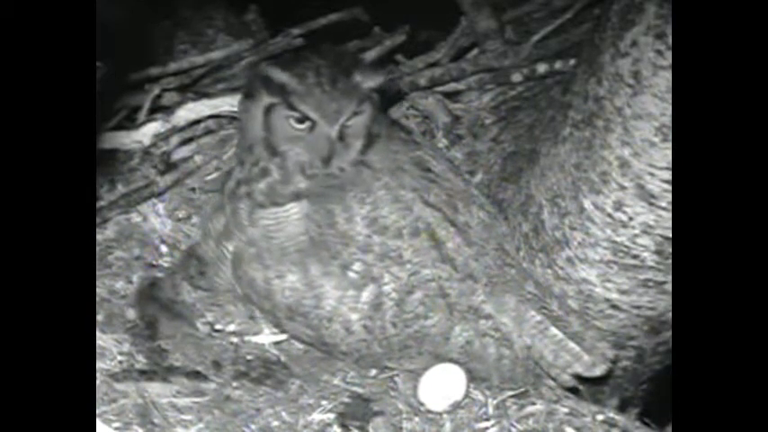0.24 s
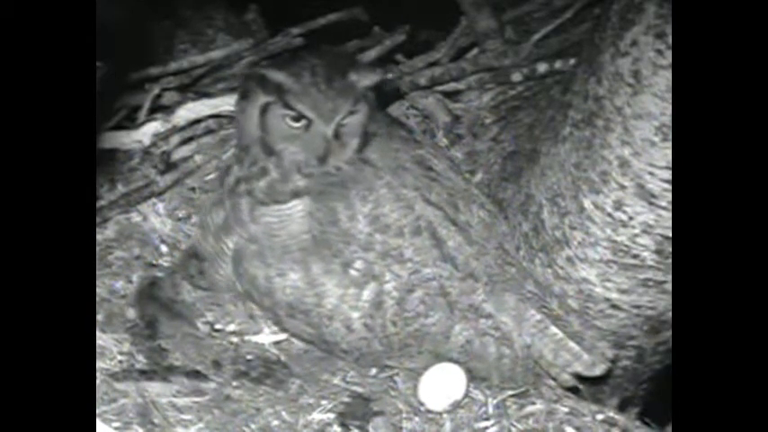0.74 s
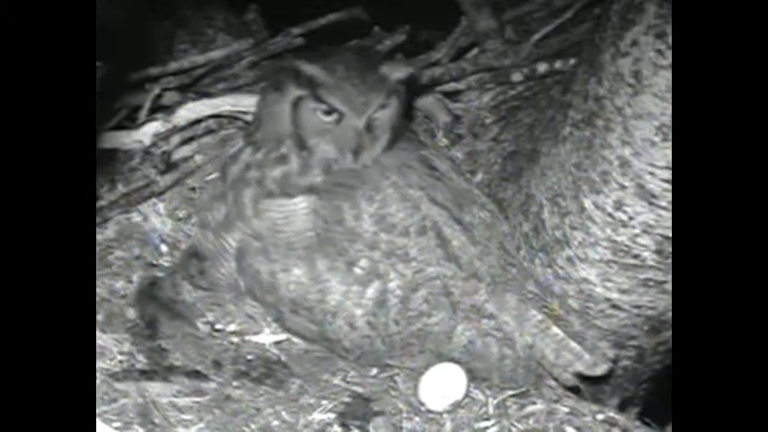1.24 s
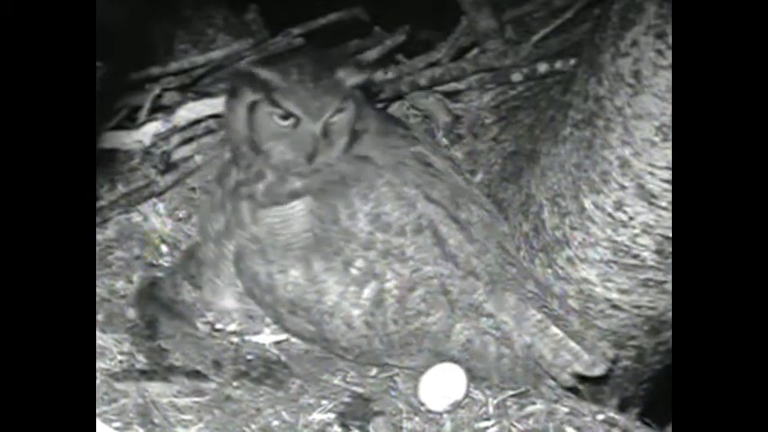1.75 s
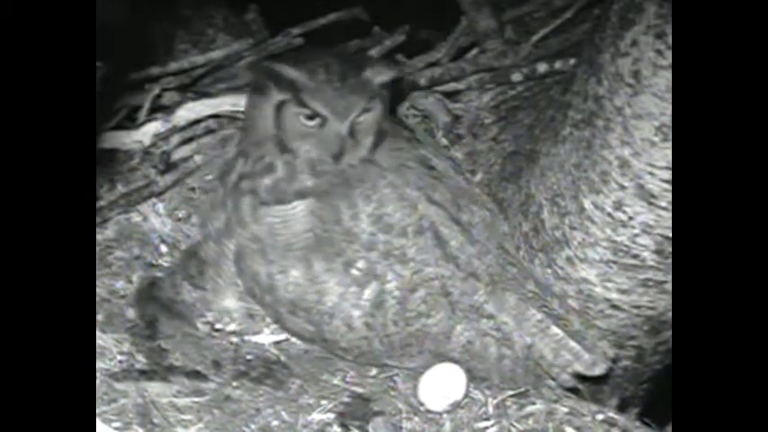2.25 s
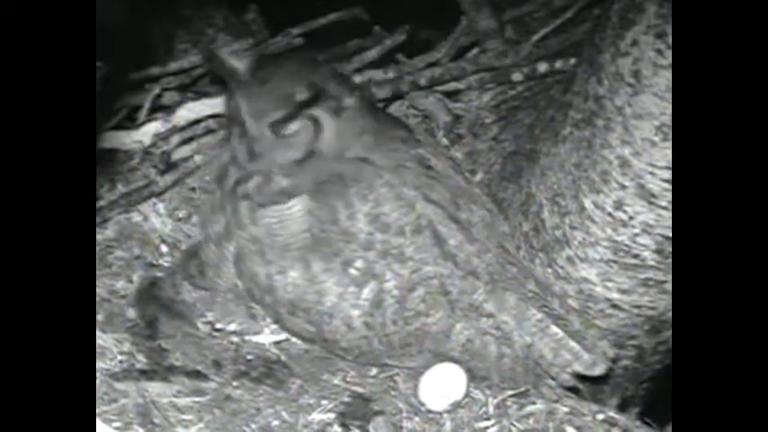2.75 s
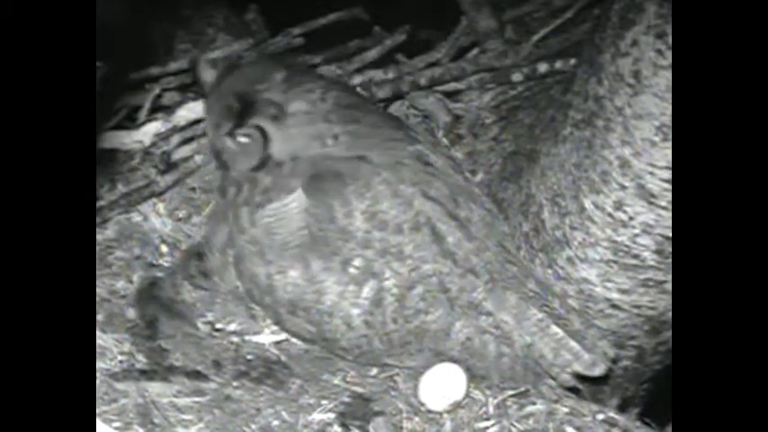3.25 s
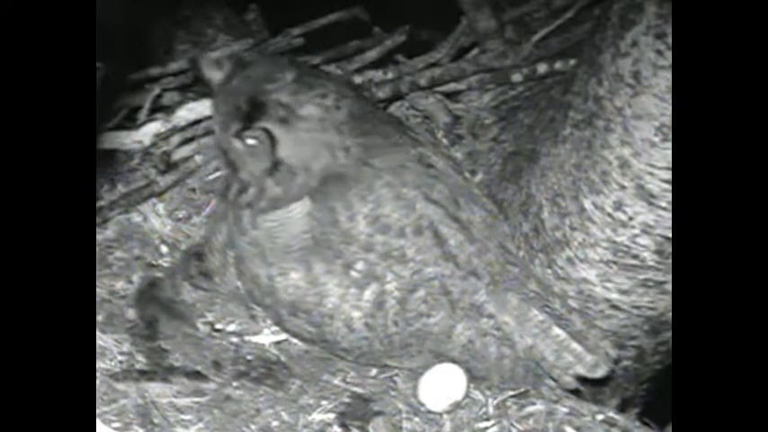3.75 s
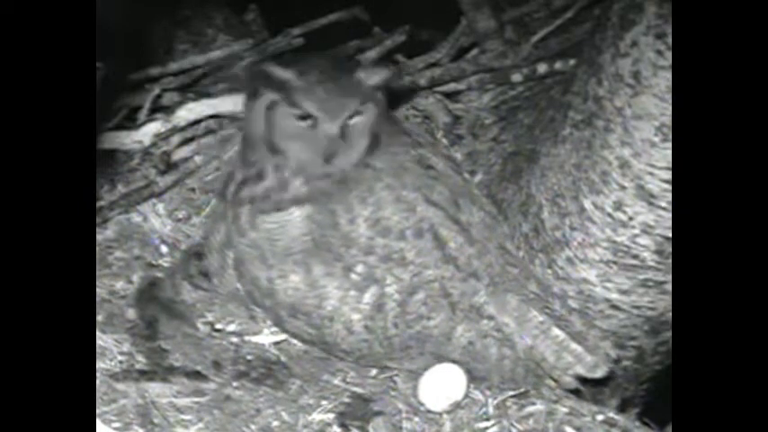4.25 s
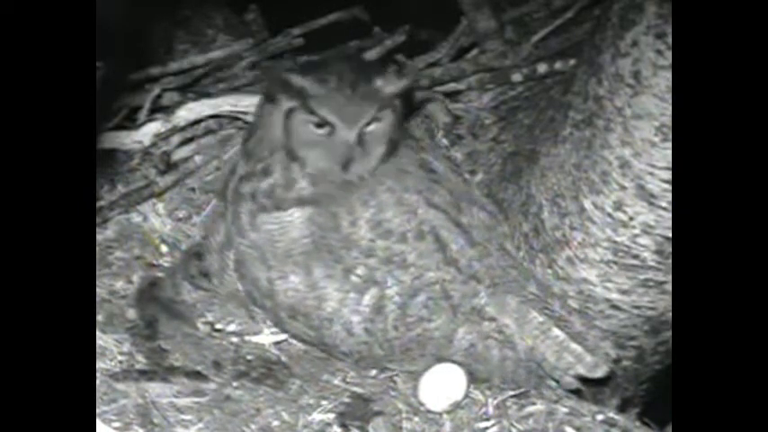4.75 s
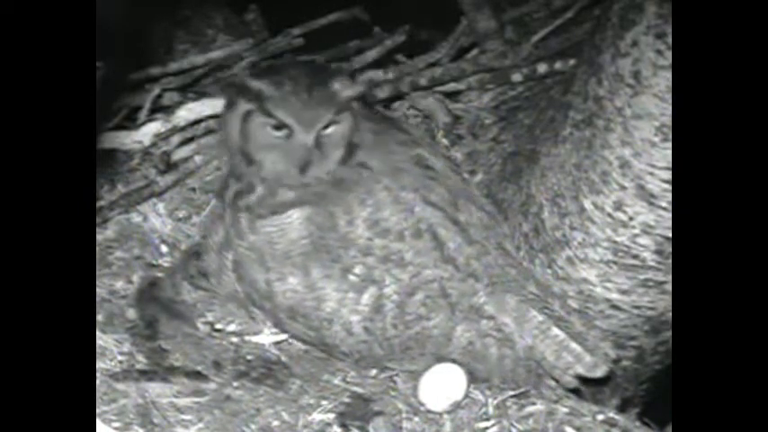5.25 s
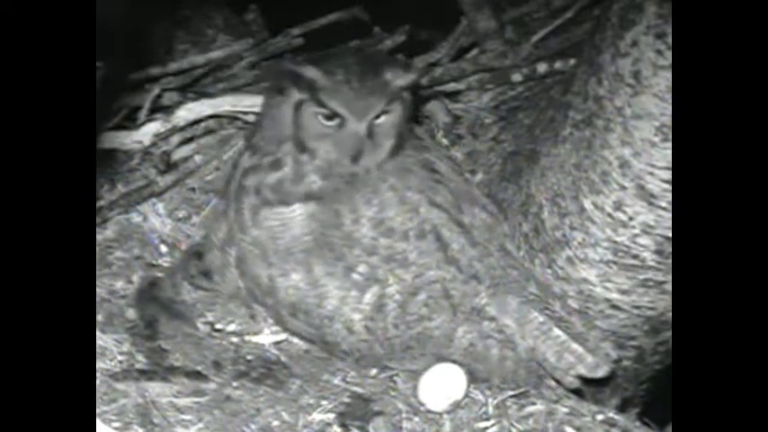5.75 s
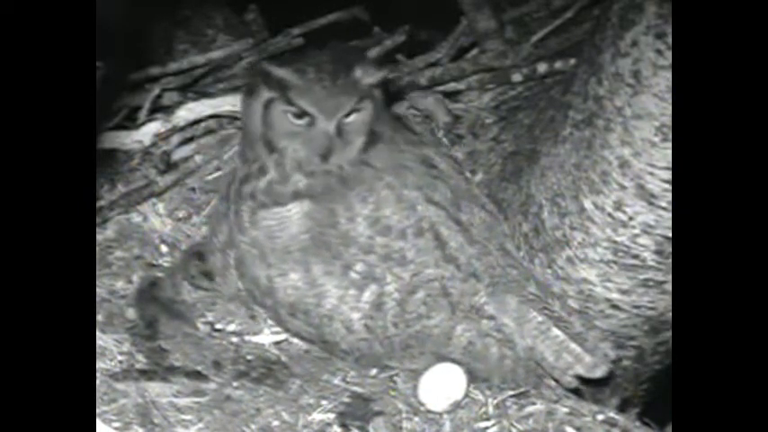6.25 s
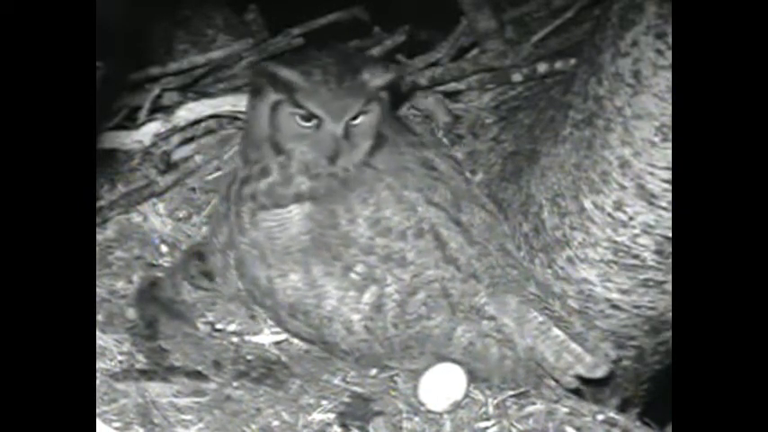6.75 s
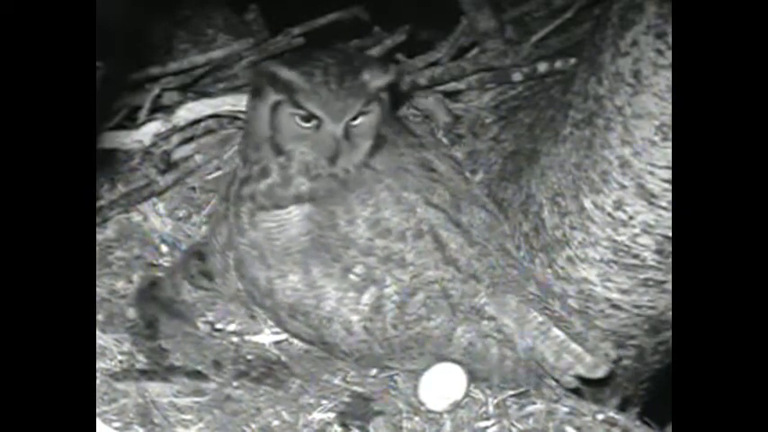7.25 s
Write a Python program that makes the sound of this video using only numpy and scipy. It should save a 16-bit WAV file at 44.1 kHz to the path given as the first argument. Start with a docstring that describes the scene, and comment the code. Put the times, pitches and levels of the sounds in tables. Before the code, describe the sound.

A night nest heard through a small, noisy microphone close to a large owl. Steady midrange hiss, a faint buzzing electrical whine and a soft hollow drone of breeze last the full 7.5 seconds. From the start, dull short drip knocks, low wind pops and tiny bright ticks fall irregularly, with small crackly flurries near 0 and 1 second. At about 1.25 seconds the owl begins one low hoot, a nearly pure, trembling tone with a little throat air; it starts weakly, swells, edges upward in pitch and ends by 1.55, just as a knock lands. No more calls follow. Firmer hollow knocks come around 2.8, 3.2, 5.6 and 6.0 seconds, with a sharper tick at 5.4. Between 6.0 and 6.6 the ticks cluster with faint twig rustling, then thin out to sparse ticks, a last knock near 7.3 and unchanged hiss.

```python
"""An owl at a nest gives one short low hoot: a trembling near sine, weak upper partials, throat air.
Drips ring the modes of the microphone's hollow housing; wind pops, drones and rumbles in it.
Small ticks and a patter ring near 2.3 kHz; twigs rustle as shaped noise.
The electronics add coloured hiss and a faint whine that sweeps in step with the mains."""
import sys
import numpy as np
from scipy import signal
from scipy.fft import rfft, irfft
from scipy.io import wavfile
from scipy.ndimage import uniform_filter1d

SR = 44100
rng = np.random.default_rng(int(sys.argv[2]) if len(sys.argv) > 2 else 0)


def persist_wave(psi):
    """Save psi, clipped to +-1, as 16-bit WAV."""
    counts = np.round(np.clip(psi, -1, 1) * 32767).astype(np.int16)
    wavfile.write(sys.argv[1], SR, np.atleast_2d(counts).T)


N = 330573

# Hoot contour: (time [s], strongest partial before tremble [Hz], level of the strongest partial [dB])
HOOT_CONTOUR = [(1.25, 379.5, -49), (1.262, 432, -46), (1.272, 441, -43), (1.29, 426, -58),
                (1.299, 438, -40), (1.32, 408, -44.5), (1.329, 413, -34), (1.348, 391, -36),
                (1.368, 384, -33.5), (1.383, 399, -31.5), (1.4, 416.6, -31), (1.434, 406, -30.5),
                (1.45, 432, -29.5), (1.476, 417, -30), (1.5, 428, -32), (1.521, 432, -31), (1.53, 445, -47),
                (1.536, 447, -39), (1.554, 451, -40)]
# Hoot partials: (multiple of the strongest partial [1], relative level [dB], flutter depth [dB])
VOICE_PARTIALS = [(1, 0, .2), (1.5, -15, 1.3), (2, -29, 2.5)]
# Throat air colour: (frequency [Hz], relative level [dB])
THROAT_AIR_COLOUR = [(250, -20), (400, -5), (520, 4), (600, -3), (700, 1), (800, -12), (1300, -40)]
# Housing modes: (frequency [Hz], relative level [dB], decay by 60 dB [s], sign at microphone [1])
HOUSING_MODES = [(314, -9.7, .042, 1), (362, -11.5, .09, -1), (435, 0, .023, -1), (464, -25.6, .125, -1),
                 (536, -12, .078, -1), (694, -30.2, .044, -1), (1010, -23, .025, 1)]
# Drips on the housing: (time [s], peak [dB], lowest mode over its usual strength [dB])
DRIP_KNOCKS = [(0.091, -32.5, 1), (0.229, -41, -6), (0.404, -40.5, -6), (0.5587, -37, -11),
               (0.7285, -36.5, -3), (0.8333, -40.5, 1), (0.942, -40.5, 10), (1.125, -42, -9),
               (1.564, -30.5, 2.5), (1.6787, -34.5, 0), (1.7507, -41, 1), (1.779, -56, 2),
               (2.019, -41, -22), (2.2126, -42, 9.5), (2.3914, -36, -1), (2.5415, -35.5, 0),
               (2.8189, -32, -10), (3.0139, -48, -5), (3.0598, -45, -3), (3.179, -29, 1.5),
               (3.3491, -55, 0), (3.4546, -40.5, -5), (3.6742, -46.5, 2), (4.2633, -40.5, -11),
               (4.7649, -40.5, -8), (5.0119, -43.5, -14), (5.323, -41.5, -7), (5.3581, -41.5, 0),
               (5.5865, -25.5, -0.5), (5.7122, -45, -5), (5.798, -39, -5), (5.984, -28, 0),
               (6.124, -39.5, -1), (6.331, -35.5, 2), (6.3487, -37, 3), (7.3381, -36.5, 2)]
# Low pops of wind on the microphone: (time [s], peak [dB], pitch [Hz])
WIND_POPS = [(0.165, -41, 423), (0.327, -36, 375), (0.343, -39, 230), (0.355, -44, 382), (0.463, -40, 285),
             (0.491, -39.5, 495), (0.75, -39, 460), (1.108, -39.5, 420), (1.204, -38, 540),
             (1.244, -44, 358), (1.682, -50, 228), (1.835, -43, 418), (1.956, -37, 413), (1.975, -36, 433),
             (2.023, -40, 444), (2.223, -40, 425), (2.26, -41, 420), (2.281, -39, 415), (2.324, -44, 414),
             (2.377, -47, 480), (2.441, -46, 450), (2.806, -38, 427), (2.82, -33.5, 387),
             (3.022, -39.5, 450), (3.094, -41, 450), (3.429, -38.5, 520), (3.544, -43, 450),
             (3.79, -38.5, 448), (4.098, -40, 393), (4.298, -43.5, 282), (5.319, -45, 376),
             (5.48, -43, 450), (5.854, -38, 376), (5.865, -37, 317), (6.166, -47, 455), (6.925, -38, 450),
             (7.174, -48, 266), (7.364, -49, 420)]
# Single ticks: (time [s], peak [dB], pitch [Hz])
SINGLE_TICKS = [(0.041, -52, 2290), (0.0533, -42, 2370), (0.0782, -50, 2230), (0.188, -51, 2360),
                (0.3208, -42.5, 2370), (0.3441, -45, 2250), (0.4035, -52, 2280), (0.426, -52, 2260),
                (0.521, -56, 2230), (0.5018, -53, 2200), (0.5976, -38.5, 2320), (0.6529, -50, 2280),
                (0.8555, -44.5, 2150), (0.938, -51, 2330), (0.9652, -47, 2220), (0.976, -49, 2220),
                (0.985, -49, 2250), (0.996, -48, 2310), (1.0071, -45, 2290), (1.0944, -54, 2350),
                (1.102, -50, 2380), (1.2161, -55, 2230), (1.365, -54, 2300), (1.3995, -43, 2320),
                (1.466, -52, 2220), (1.483, -51, 2250), (1.52, -53, 2290), (1.617, -53, 2360),
                (1.63, -53, 2300), (1.66, -47, 2370), (1.85, -52, 2370), (1.904, -54, 2330),
                (1.924, -49, 2280), (1.9584, -51, 2250), (2.1874, -55, 2330), (2.4818, -49, 2280),
                (2.511, -47, 2280), (2.55, -56, 2330), (2.566, -52, 2200), (2.6609, -42, 2440),
                (2.83, -54, 2290), (2.853, -52, 2190), (2.9445, -46.5, 2290), (3.0255, -47.5, 2340),
                (3.047, -57, 2280), (3.0845, -51, 2380), (3.572, -48, 2280), (3.7504, -50, 2460),
                (3.8043, -49, 2320), (3.813, -50, 2290), (3.845, -53, 2370), (3.9127, -42, 2340),
                (4.2413, -45.5, 2300), (4.252, -54, 2290), (4.4079, -45.5, 2270), (4.5461, -47.5, 2280),
                (4.686, -45.5, 2380), (4.8357, -43, 2300), (4.9234, -52, 2220), (4.9521, -49, 2320),
                (5.015, -44, 2340), (5.049, -45, 2290), (5.1637, -47, 2350), (5.249, -49, 2380),
                (5.3562, -52, 2260), (5.444, -36.5, 2360), (5.672, -52, 2400), (5.9065, -46, 2340),
                (6.0521, -50, 2420), (6.082, -57, 2290), (6.204, -54, 2310), (6.278, -57, 2300),
                (6.296, -49, 2270), (6.313, -53, 2260), (6.3355, -55, 2240), (6.346, -49, 2240),
                (6.377, -49, 2230), (6.398, -47, 2250), (6.411, -45, 2260), (6.4423, -47, 2300),
                (6.533, -56, 2300), (6.7131, -53, 2170), (6.7562, -44.5, 2380), (6.8379, -49, 2330),
                (6.865, -54, 2310), (6.936, -53, 2300), (7.0344, -53, 2190), (7.1556, -54, 2300),
                (7.17, -56, 2410), (7.36, -57, 2330)]
# Flurries of small ticks as the nest stirs: (start [s], end [s], level [dB], pitch [Hz])
TICK_FLURRIES = [(0, 0.106, -59.5, 2290), (0.273, 0.36, -81, 2270), (0.398, 0.448, -73, 2270),
                 (0.486, 0.542, -64, 2160), (0.885, 0.945, -75, 2330), (0.95, 1.0, -59.5, 2210),
                 (1.0, 1.065, -60.5, 2200), (1.068, 1.083, -62, 2280), (1.092, 1.116, -65, 2380),
                 (1.45, 1.559, -62.5, 2290), (1.641, 1.681, -61, 2330), (1.822, 2.003, -72, 2300),
                 (2.08, 2.13, -66, 2340), (2.294, 2.33, -65, 2330), (2.47, 2.525, -65, 2300),
                 (2.538, 2.583, -64, 2270), (2.81, 2.863, -69, 2290), (3.01, 3.114, -66, 2330),
                 (3.12, 3.192, -63.5, 2260), (3.79, 3.824, -71, 2290), (4.106, 4.273, -71, 2250),
                 (4.883, 5.067, -72, 2290), (6.042, 6.09, -68, 2360), (6.15, 6.16, -63, 2210),
                 (6.198, 6.25, -67, 2290), (6.25, 6.376, -64, 2250), (6.362, 6.43, -56, 2236),
                 (6.423, 6.475, -64, 2380), (6.507, 6.55, -73, 2300), (6.588, 6.613, -62.5, 2230),
                 (6.83, 6.88, -66, 2330), (7.345, 7.43, -66, 2290)]
# Steady patter of small ticks: (pitch [Hz], relative level [dB])
PATTER_PITCHES = [(2190, -11), (2240, 2), (2320, -3), (2430, 0)]
# Leaf and twig colour: (frequency [Hz], relative level [dB])
TWIG_COLOUR = [(600, -6.5), (1000, -1), (1600, -2), (2300, -4), (3000, -12), (3800, -21)]
# Breeze: (time [s], level of the drone in the housing [dB])
BREEZE_LEVEL = [(0, -51.5), (0.3, -50.5), (0.6, -52), (0.9, -50), (1.2, -50), (1.6, -49.5), (2.0, -49.5),
                (2.4, -50), (2.8, -49.5), (3.2, -49.5), (3.7, -49.5), (4.0, -51.5), (4.6, -51),
                (5.2, -51.5), (5.7, -52), (6.1, -50), (6.6, -51), (7.0, -52), (7.5, -52.5)]
# Drone colour: (frequency [Hz], relative level [dB])
DRONE_COLOUR = [(150, -29.5), (250, -14), (350, -4), (430, 0), (550, -1.5), (700, -7), (1000, -17.5),
                (1500, -30)]
# Low gusts: (peak time [s], peak level [dB], fade [dB/s])
GUST_TIMES = [(0.05, -64.5, 85), (0.34, -56, 139), (0.47, -57, 160), (0.6, -71, 7.5), (0.98, -74, 27.5),
              (1.67, -60, 52), (2.22, -64, 48.5), (2.46, -57, 53), (3.55, -69.5, 25), (4.09, -61, 150),
              (4.26, -57.5, 67), (4.4, -72, 94), (4.85, -71, 31), (5.12, -68, 90), (5.32, -59, 86),
              (5.68, -62, 40), (5.86, -60, 198), (6.12, -65, 108), (7.18, -64, 172)]
# Gust colour: (frequency [Hz], relative level [dB])
GUST_COLOUR = [(30, -7.5), (60, -2.5), (100, 2.5), (160, 0.5), (220, 3), (300, -7.5), (420, -25.5)]
# Whine sweeps in each mains cycle: (start [cycle], end [cycle], from [Hz], to [Hz], mid-sweep rms [dB])
WHINE_SWEEPS = [(0.021, 0.154, 5050, 10610, -62), (0.324, 0.499, 6495, 2676, -68),
                (0.366, 0.519, 8120, 10180, -71.5), (0.477, 0.646, 6000, 10500, -69),
                (0.83, 0.961, 6130, 3670, -84.5)]
# Amplifier hiss colour: (frequency [Hz], relative level [dB])
HISS_COLOUR = [(20, -17), (60, -22.5), (150, -9), (400, -12.5), (1000, 0.5), (2000, 0.5), (3000, 0),
               (4500, -8), (7000, -8.5), (10000, -18.5)]

WAVER_DEPTH_HZ, WAVER_RATE_HZ, WAVER_TOP_S = 4, 55, 1.452  # pitch tremble; highest at WAVER_TOP_S
OVERTONE_LOSS_DB_PER_DB, FULL_VOICE_DB = 2.5, -30.5  # upper partials lose this per dB under full voice
BRIGHTEST_S, DULLING_DB_PER_S = 1.41, 170  # upper partials fade after the brightest moment
THROAT_AIR_DB = -23.5
TICK_RISE_S, TICK_HOLD_S, TICK_TAIL_S, TICK_TAIL_DB = .0011, .0034, .006, -17
SOFT_TICK_DB, SOFT_TICK_STRETCH_PER_DB = -46, .15  # ticks under this peak hold longer
TICK_EDGE_RATIO, TICK_EDGE_DB = 1.137, -9.5  # weaker ring above each single tick
TICK_CYCLES, FAINT_TICK_HZ, FAINT_TICK_DB = 4.84, 2290, -57  # dB: peak of the smallest stray ticks
PATTER_DB = -76
CHIRR_CYCLES, CHIRR_POWER_SHARE = 16, .65  # share of flurry power on the flurry's own pitch
RUSTLE_OVER_BREEZE_DB, RUSTLE_OVER_FLURRY_DB = -12.5, -4
GUST_RISE_DB_PER_S, CALM_DB = 351, -79
MAINS_HZ = 59.977
HISS_DB, FLOOR_DB = -61.5, -102
LOW_CUT_HZ, ROLL_HZ, EDGE_HZ = 220, 8180, 9975


def hoot():
    """Trembling near sine, unsteady partials that come out at full voice, air rushing in the throat."""
    s, hz, db = np.transpose(HOOT_CONTOUR)
    t = np.arange(N) / SR
    level_db = along(s, db)
    waver_hz = WAVER_DEPTH_HZ * np.cos(2 * np.pi * WAVER_RATE_HZ * (t - WAVER_TOP_S))
    strongest_hz = (along(s, hz) + waver_hz) * lumps(.005, .04)
    turns = np.cumsum(strongest_hz) / SR
    effort_db = OVERTONE_LOSS_DB_PER_DB * (level_db - FULL_VOICE_DB)
    effort_db -= DULLING_DB_PER_S * np.maximum(t - BRIGHTEST_S, 0)
    tone = np.zeros(N)
    for multiple, partial_db, flutter_db in VOICE_PARTIALS:
        partial = gain_of(partial_db) * np.sin(2 * np.pi * multiple * turns) * lumps(.0051, flutter_db)
        if multiple > 1:
            partial *= gain_of(effort_db)
        tone += partial
    air = gain_of(THROAT_AIR_DB) * noise(THROAT_AIR_COLOUR)
    sounding = uniform_filter1d(1. * (t > s[0]) * (t < s[-1]), size=600)  # soft ends
    return (np.sqrt(2) * tone + air) * gain_of(level_db) * sounding


def knocks():
    """Drips strike the housing and ring its modes."""
    out = np.zeros(N)
    for at, db, low_db in DRIP_KNOCKS:
        add(out, at, gain_of(db) * knock(low_db))
    return out


def knock(low_db=0):
    """Decaying housing modes, swelling as the blow spreads through the wall; peak 1."""
    t = np.arange(SR // 5) / SR
    ring = np.zeros(len(t))
    for k, (hz, db, t60_s, sign) in enumerate(HOUSING_MODES):
        mode_db = db + low_db * (k == 0) - 60 * t / t60_s
        ring += sign * gain_of(mode_db) * np.sin(2 * np.pi * hz * t)
    ring *= 1 - np.exp(-t / .01)
    return ring / abs(ring).max()


def pops():
    """Wind pops on the microphone: short low blips."""
    out = np.zeros(N)
    for at, db, hz in WIND_POPS:
        add(out, at, gain_of(db) * blip(hz, cycles=1.57))
    return out


def ticks():
    """Fast-rising rings with a weaker higher edge, over random stray ticks."""
    strays = drops(per_s=5.4, spread_db=1)
    out = gain_of(FAINT_TICK_DB) * ringing(strays, blip(FAINT_TICK_HZ, TICK_CYCLES))
    for at, db, hz in SINGLE_TICKS:
        stretch = 1 + SOFT_TICK_STRETCH_PER_DB * max(SOFT_TICK_DB - db, 0)
        add(out, at, gain_of(db) * tick(hz, stretch))
        add(out, at, gain_of(db + TICK_EDGE_DB) * blip(TICK_EDGE_RATIO * hz, TICK_CYCLES))
    return out


def tick(hz, stretch):
    """Sine that starts fast, holds a few cycles, drops to a faint tail; envelope peak 1."""
    t = np.arange(SR // 40) / SR
    hold = np.exp(-(t / (TICK_HOLD_S * stretch)) ** 3)
    tail = gain_of(TICK_TAIL_DB) * np.exp(-t / TICK_TAIL_S)
    shape = (1 - np.exp(-t / TICK_RISE_S)) ** 2 * (hold + tail)
    return shape / shape.max() * np.sin(2 * np.pi * hz * t)


def patter():
    """Dense small ticks on several pitches, louder in flurries."""
    small = np.zeros(N)
    for hz, db in PATTER_PITCHES:
        small += gain_of(db) * ringing(drops(per_s=260, spread_db=1), blip(hz, cycles=10.7))
    level = gain_of(PATTER_DB) + np.sqrt(1 - CHIRR_POWER_SHARE) * stirring()
    return level * evened(small)


def chirr():
    """Flurry ticks on one pitch, dense enough to blend."""
    taps = drops(per_s=400, spread_db=3)
    out = np.zeros(N)
    for start, end, db, hz in TICK_FLURRIES:
        some = taps[round(start * SR):round(end * SR)]
        ring = evened(signal.oaconvolve(some, blip(hz, CHIRR_CYCLES), "same"))
        add(out, start, gain_of(db) * ring * signal.windows.tukey(len(some), .25))
    return np.sqrt(CHIRR_POWER_SHARE) * out


def stirring():
    """Flurry level: each swells, holds and fades."""
    level = np.zeros(N)
    for start, end, db, _ in TICK_FLURRIES:
        add(level, start, gain_of(db) * signal.windows.tukey(round((end - start) * SR), .4))
    return level


def rustle():
    """Leaves and twigs: noise, faint in the breeze, louder as the nest stirs."""
    level = gain_of(RUSTLE_OVER_BREEZE_DB) * breeze() + gain_of(RUSTLE_OVER_FLURRY_DB) * stirring()
    return level * noise(TWIG_COLOUR) * lumps(.0074, 1.4)


def drone():
    """Moving air keeps the hollow droning, with many faint drips; both follow the breeze level."""
    faint_drips = evened(ringing(drops(per_s=60, spread_db=2), knock()))
    return breeze() * (noise(DRONE_COLOUR) * lumps(.029, 1) + gain_of(-16) * faint_drips)


def breeze():
    """Gain of the breeze at every sample."""
    return gain_of(along(*np.transpose(BREEZE_LEVEL)))


def gusts():
    """Low lumpy noise and random puffs rumble with each gust."""
    puffs = evened(ringing(drops(per_s=23, spread_db=3), blip(234, cycles=.87)))
    return gusting() * (noise(GUST_COLOUR) * lumps(.0091, 4.5) + gain_of(-2) * puffs)


def gusting():
    """Calm air plus gusts that come up fast and fade at their own pace."""
    t = np.arange(N) / SR
    level = np.full(N, gain_of(CALM_DB))
    for at, db, fade_db_per_s in GUST_TIMES:
        drop_db = np.where(t < at, GUST_RISE_DB_PER_S * (at - t), fade_db_per_s * (t - at))
        level += gain_of(db - drop_db)
    return level


def whine():
    """Switching tone swept by the mains wave; detune and phase are random in each cycle."""
    cycles = np.arange(N) / SR * MAINS_HZ
    count = int(cycles[-1]) + 1
    out = np.zeros(N)
    for start, end, from_hz, to_hz, db in WHINE_SWEEPS:
        u = np.clip((cycles % 1 - start) / (end - start), 0, 1)  # progress through the sweep
        detune, phase = rng.standard_normal((2, count))[:, cycles.astype(int)]
        hz = (from_hz + (to_hz - from_hz) * u) * (1 + .015 * detune)
        turns = np.cumsum(hz) / SR + phase
        out += np.sqrt(2) * gain_of(db) * np.sin(np.pi * u) * np.sin(2 * np.pi * turns)
    return out


def gain_of(db):
    """Decibels to a factor."""
    return 10 ** (np.asarray(db) / 20)


def evened(x):
    """Scaled to rms 1."""
    return x / np.sqrt(np.mean(x ** 2) + 1e-20)


def along(s, value):
    """Curve read at every sample."""
    return np.interp(np.arange(N) / SR, s, value)


def add(mix, s, sound):
    """Mixes a sound in at second s."""
    part = mix[round(s * SR):][:len(sound)]
    part += sound[:len(part)]


def noise(colour):
    """Steady noise of the given colour, rms 1."""
    hz, db = np.transpose(colour)
    bins_hz = np.fft.rfftfreq(N, 1 / SR)
    bins_db = np.interp(np.log(bins_hz + 1), np.log(hz), db)
    return evened(irfft(rfft(rng.standard_normal(N)) * gain_of(bins_db), N))


def lumps(length_s, depth_db):
    """Randomly wandering gain, rms 1."""
    size = round(length_s * SR)
    slow = uniform_filter1d(uniform_filter1d(rng.standard_normal(N), size), size)
    return evened(gain_of(depth_db * evened(slow)))


def drops(per_s, spread_db):
    """Random impulses of at least 1, most of them small."""
    sizes = gain_of(spread_db * np.minimum(rng.exponential(1, N), 4))
    return sizes * (rng.random(N) < per_s / SR)


def ringing(impulses, sound):
    """Plays the sound at every impulse."""
    return signal.oaconvolve(impulses, sound)[:N]


def blip(hz, cycles):
    """Sine that swells for the given cycles and fades over twice as many; peak about 1."""
    turns = np.arange(round(3 * cycles * SR / hz)) * hz / SR
    x = turns / cycles
    swell = x ** 2 * np.exp(2 - 2 * x) * np.cos(np.pi * x / 6)
    return swell * np.sin(2 * np.pi * turns)


def scene():
    """All that reaches the microphone."""
    nest = hoot() + ticks() + patter() + chirr() + rustle()
    housing = knocks() + pops() + drone() + gusts()
    return (nest + housing)[None]


def record(dry):
    """Low cut, amplifier hiss and whine, treble roll-off, band limit, faint white noise."""
    thin = signal.sosfilt(signal.butter(2, LOW_CUT_HZ, "high", fs=SR, output="sos"), dry)
    wired = thin + whine() + gain_of(HISS_DB) * noise(HISS_COLOUR)
    soft = signal.sosfilt(signal.butter(6, ROLL_HZ, fs=SR, output="sos"), wired)
    band_limit = signal.firwin(1023, EDGE_HZ, window=("kaiser", 9), fs=SR)
    cut = signal.oaconvolve(soft, band_limit[None], "same")
    return cut + gain_of(FLOOR_DB) * rng.standard_normal(dry.shape)


dry = scene()
out = record(dry)
persist_wave(out)
```